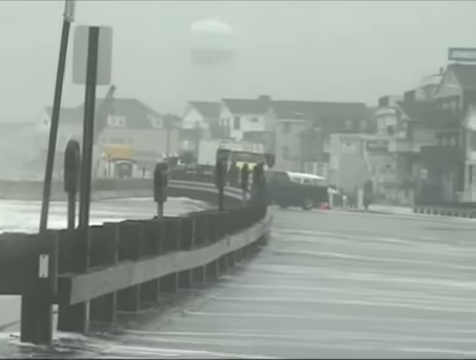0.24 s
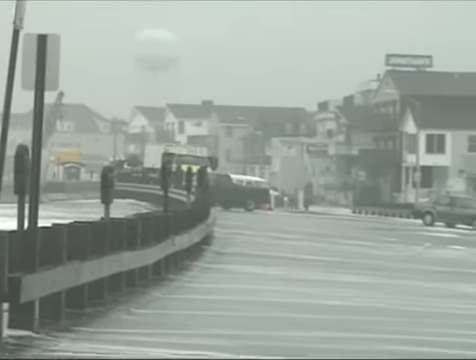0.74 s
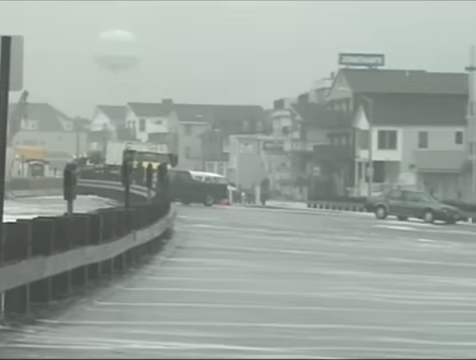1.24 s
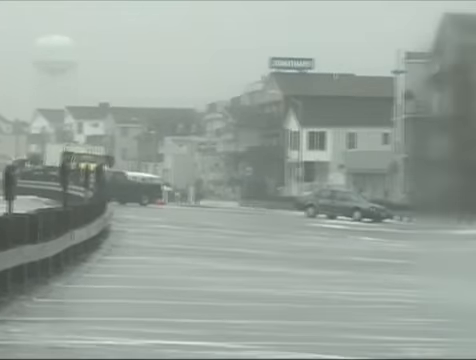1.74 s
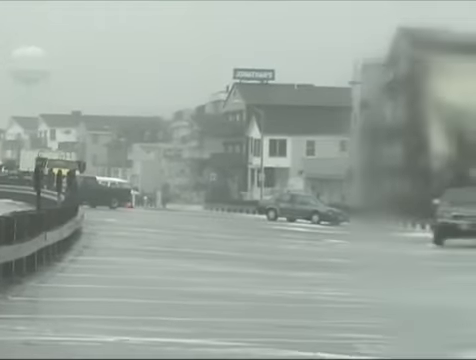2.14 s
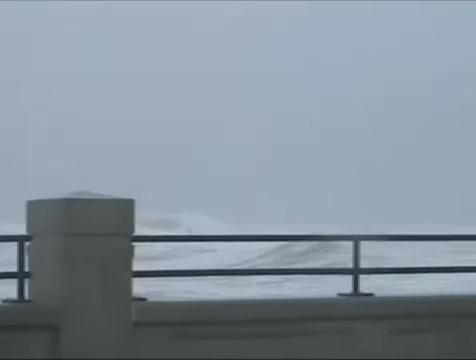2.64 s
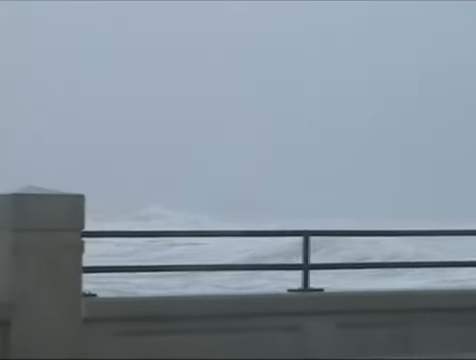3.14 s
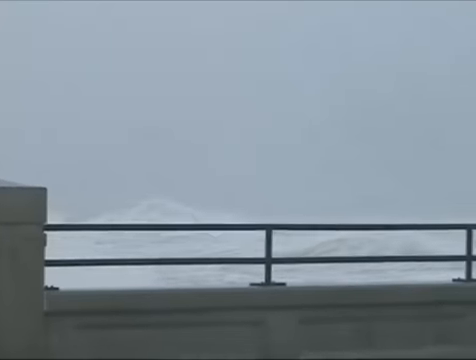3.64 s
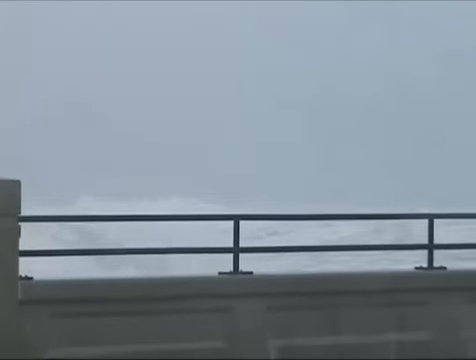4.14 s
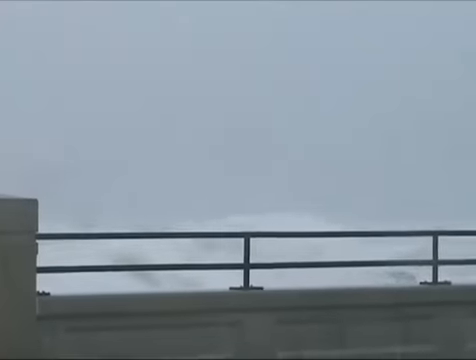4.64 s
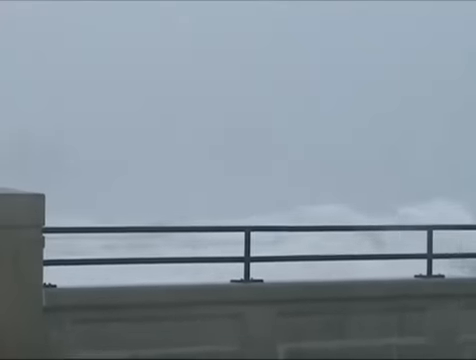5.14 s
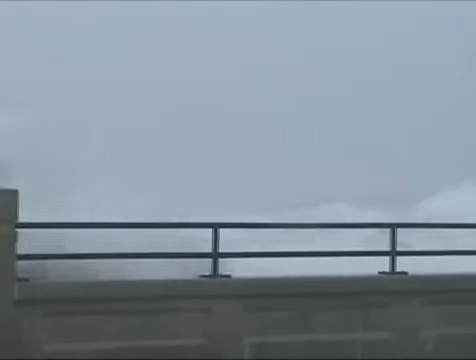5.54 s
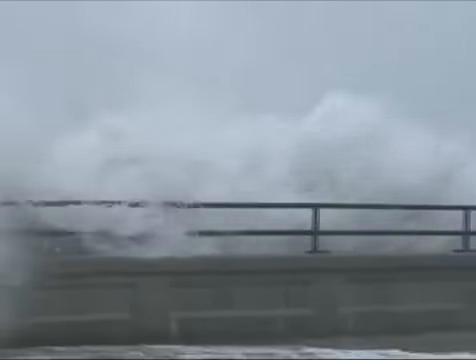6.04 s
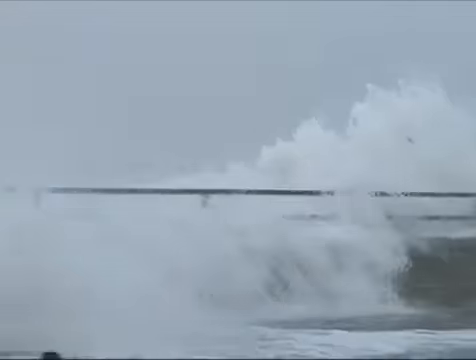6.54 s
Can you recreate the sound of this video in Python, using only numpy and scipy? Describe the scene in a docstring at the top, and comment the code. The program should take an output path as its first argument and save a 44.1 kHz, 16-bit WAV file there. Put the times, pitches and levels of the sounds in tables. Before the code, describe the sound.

A muffled roar of heavy waves and wind is heard from within a closed car on a sea front, its engine idling with a deep hum. Spray ticks lightly on the roof and glass. After about a second and a half a windshield wiper scrapes, thumps and shudders across and back, then knocks to rest. The storm continues evenly, with brief faint rustles and a very faint camera whine beside the microphone.

```python
"""Inside a parked car on a sea front in a storm, with the windows shut and the engine idling. Surf, wind and
blower air blend into a dull roar, coloured by the resonances of the cabin, over the boom of the engine's firing
rate. The wiper makes one sweep out and back, its rubber juddering and its arm knocking. Spray ticks on roof and
glass, brief rustles sound in the treble, and the tape drum of a hand-held camera whines faintly next to the
microphone. Between about 2 and 3.7 s the sound slowly changes from its street-side colour to its sea-side
colour."""
import sys
import numpy as np
from scipy import signal
from scipy.fft import rfft, irfft, next_fast_len
from scipy.io import wavfile
from scipy.ndimage import uniform_filter1d

SR = 44100
rng = np.random.default_rng(int(sys.argv[2]) if len(sys.argv) > 2 else 0)


def transcribe(signal):
    """Save signal, clipped to [-1, 1], as a 16-bit WAV file at the path in sys.argv[1]."""
    frames = np.atleast_2d(signal).T
    limited = np.clip(frames, -1, 1)
    pcm = np.round(limited * 32767).astype(np.int16)
    wavfile.write(sys.argv[1], SR, pcm)


N = 299437

# spectra of the roar, street-side and sea-side: (frequency [Hz], relative density [dB])
STREET_ROAR = [(12, -52), (27, -13.5), (42, -3.5), (90, -14.5), (160, -16.5), (235, -21), (280, -24.5),
               (400, -27.5), (600, -28), (800, -35.5), (1400, -36.5), (2000, -46), (3300, -47.5),
               (4500, -55), (6500, -63.5), (9000, -100)]
SEA_ROAR = [(12, -47), (27, -13.5), (42, -6.5), (90, -12), (150, -13), (220, -18.5), (270, -21.5),
            (400, -24), (720, -26.5), (830, -32.5), (1500, -35.5), (2100, -42.5), (3300, -46),
            (4500, -53.5), (5400, -58), (6500, -64.5), (9000, -89)]
# cabin resonances: (frequency [Hz], width [Hz], street-side gain [dB], sea-side gain [dB])
CABIN_MODES = [(90, 20, 2, 2), (160, 25, 4, 0), (195, 30, 3, 5), (236, 20, 4, 2), (310, 40, 5, 4),
               (470, 50, 3, 2), (690, 120, 1, 3), (1180, 150, 4, 0), (980, 120, 0, 3), (2800, 600, 0, 2),
               (878, 34, 11, 0)]
# strength of the storm: (time [s], level [dB], treble gain [dB])
STORM_LEVELS = [(0, -30.5, -7), (1.1, -30, -6.5), (1.5, -30.5, -7.5), (2.8, -34.5, -4.5), (3.5, -33, -6.5),
                (3.95, -30, -4.5), (4.55, -30.5, -7.5), (4.85, -32, -2.5), (5.12, -31, -5.5),
                (5.35, -31.5, -3.5), (5.6, -31.5, -3.5), (5.9, -31.5, -2.5), (6.2, -32, -0.5),
                (6.45, -31.5, -4), (6.79, -32, -4.5)]
# engine boom at the microphone: (time [s], level [dB])
BOOM_LEVELS = [(0.0, -27), (0.17, -25), (2.23, -25), (2.44, -31), (2.55, -28.5), (3.63, -31), (3.72, -25.5),
               (3.99, -31.5), (4.1, -25.5), (4.25, -39), (4.97, -28.5), (5.99, -32.5), (6.35, -26.5),
               (6.69, -29.5), (6.79, -36)]
# its overtones: (multiple of the firing rate, street-side level [dB], sea-side level [dB])
BOOM_OVERTONES = [(1.5, -50, -46), (2, -41, -40), (3, -46, -42), (5, -49, -48)]
# stretches of the blade's travel on wet glass: (start [s], length [s], rise [s], rumble [dB],
# scrape [dB], water hiss [dB], squeal [dB], slope of all but the rumble [dB/s])
BLADE_STROKES = [(1.475, 0.057, 0.023, -27.5, -60, -64, -62, 0),
                 (1.499, 0.096, 0.05, -24, -37.5, -60, -48, 0),
                 (1.558, 0.13, 0.045, -27.5, -42, -53.5, -62, -3),
                 (1.637, 0.12, 0.034, -27.5, -48, -58, -60, 5), (1.72, 0.7, 0.04, -35, -46, -57, -62, -21),
                 (2.064, 0.08, 0.019, -45, -55, -75, -58, 0), (2.39, 0.17, 0.056, -35, -53, -57, -55, 0),
                 (2.508, 0.22, 0.04, -32, -61, -56, -48, -19)]
# spectra of linkage, scraping rubber, ringing lip and water: (frequency [Hz], relative density [dB])
LINKAGE_RUMBLE = [(50, -37), (85, -0.5), (130, -1), (180, -4), (300, -11.5), (450, -21.5), (700, -21.5),
                  (1000, -38), (1600, -30)]
RUBBER_SCRAPE = [(350, 13.5), (600, -19), (900, -6), (1200, -3), (1400, -15), (1900, -8), (2500, -13.5),
                 (3400, -15), (4500, -29)]
LIP_SQUEAL = [(950, -29), (1100, -2), (1180, 5), (1280, -11), (1550, -26), (1880, -8), (2000, -20),
              (2120, -14), (2250, -22), (2420, -12), (2600, -29)]
WATER_HISS = [(2500, 16.5), (3500, 15), (5000, 5), (6200, 2), (6800, 0), (8500, 3), (9400, -6),
              (10500, -30)]
# impacts of arm and blade: (time [s], tick [dB], ring [dB], ring centre [Hz], panel thump [dB],
# thump centre [Hz], spit of water [dB])
WIPER_IMPACTS = [(1.510, -46, -40, 1900, -22, 180, -53), (1.533, -44, -31, 1150, -26, 180, -56),
                 (1.541, -33, -23, 620, -20, 180, -50), (1.547, -36, -21, 325, -16, 145, -52),
                 (1.558, -34, -32, 1550, -22, 180, -44), (1.570, -38, -35, 1550, -16, 180, -49),
                 (1.590, -46, -36, 870, -15, 115, -47), (1.623, -44, -36, 1550, -16, 100, -48),
                 (1.643, -46, -30, 400, -21, 180, -52), (1.657, -38, -35, 1550, -26, 145, -44),
                 (1.673, -32, -18, 620, -19, 180, -50), (1.685, -38, -30, 1120, -14, 125, -44),
                 (1.692, -44, -22, 540, -18, 180, -52), (1.706, -44, -31, 1150, -11, 118, -49),
                 (1.8515, -44, -28, 960, -26, 145, -54), (1.855, -56, -44, 3800, -40, 145, -58),
                 (1.866, -56, -37, 1040, -40, 145, -58), (2.103, -44, -35, 1150, -27, 145, -50),
                 (2.118, -54, -36, 870, -17, 105, -64), (2.130, -50, -42, 3300, -30, 115, -62),
                 (2.132, -54, -37, 1550, -40, 115, -64), (2.460, -50, -40, 560, -21, 180, -58),
                 (2.7090, -23.5, -21, 620, -26, 180, -58)]
# modes of the wiper arm: (frequency [Hz], time to fall 60 dB [s])
ARM_MODES = [(325, .05), (560, .035), (690, .02), (870, .03), (1040, .045), (1140, .045), (1550, .025),
             (1870, .022), (2600, .02), (3400, .02), (3800, .025)]
# modes of the body panel under the arm: (frequency [Hz], gain [dB])
PANEL_MODES = [(95, -4), (115, 0), (145, -2), (180, 0)]
# spectra of an impact's tick and of the spray: (frequency [Hz], relative density [dB])
IMPACT_TICK = [(300, -3), (800, 0), (1400, -3), (2200, -5), (2800, -11), (3400, -21), (4200, -29),
               (7500, -28), (9200, -17), (10500, -28)]
SPRAY_TICK = [(400, -21), (1000, 16.0), (2500, -12.5), (4500, -14), (7000, -43)]
# rustles in the treble: (start [s], length [s], level [dB], share of the dull spectrum [0-1])
RUSTLE_EVENTS = [(3.291, 0.11, -56.5, 0.16), (3.859, 0.18, -59, 0.1), (3.937, 0.018, -47, 0.33),
                 (3.977, 0.014, -46.5, 0.8), (5.05, 0.1, -56.5, 0.98), (5.8, .18, -59.5, 0.7),
                 (2.025, .03, -55, 1)]
# their two spectra: (frequency [Hz], relative density [dB])
BRIGHT_SPECTRUM = [(2500, -11), (5000, -1), (6000, -8), (7000, -4), (9000, -1), (10500, -11)]
DULL_SPECTRUM = [(1200, -2), (2000, -7), (3000, -2.5), (4000, -13), (6000, -17)]
# whine of the tape drum: (multiple of the rotation rate, rms level [dB])
DRUM_HARMONICS = [(12, -76), (14, -75), (16, -71), (18, -76), (20, -78), (22, -81), (26, -79), (28, -78),
                  (32, -87), (34, -84), (36, -85), (38, -81), (40, -82), (42, -85), (44, -86), (46, -88),
                  (48, -90), (58, -84), (60, -84), (62, -86), (66, -91), (70, -89), (72, -92)]
# other steady tones of the tape drive: (frequency [Hz], rms level [dB])
DRIVE_TONES = [(3143.1, -75), (3592.6, -76), (3689, -79), (3816.5, -79), (4042.4, -79), (4265.4, -86),
               (4491.3, -77), (8434, -84), (10008, -91), (10196, -88), (10423, -82), (10648, -91)]
# hiss of the heads on the tape: (frequency [Hz], relative density [dB])
HEAD_SPECTRUM = [(4500, -30), (6300, -17.5), (7500, -6.5), (8400, -4.5), (9100, -1), (9600, -13),
                 (10300, -9.5), (10700, -9.5)]


def amp(db):
    """Amplitude ratio of a level in decibels."""
    return 10 ** (np.asarray(db) / 20)


def unit_rms(x):
    """Normalisation to an rms of 1."""
    return x / np.sqrt(np.mean(x ** 2) + 1e-20)


def gain_at(spectrum, hz):
    """Gain of a spectrum interpolated in log frequency, -90 dB outside its range."""
    f, db = np.transpose(spectrum)
    return amp(np.interp(np.log(hz + 1), np.log(f + 1), db, left=-90, right=-90))


def curves(rows, t):
    """Linear interpolation of each column of a time table at times t."""
    times, *columns = np.transpose(rows)
    return [np.interp(t, times, column) for column in columns]


def coloured(x, spectrum):
    """Filtering by multiplication of spectra; the result has rms 1."""
    size = next_fast_len(len(x))
    gain = gain_at(spectrum, np.fft.rfftfreq(size, 1 / SR))
    return unit_rms(irfft(rfft(x, size) * gain, size)[:len(x)])


def noise(spectrum, size=N):
    """Gaussian noise of the given spectrum and rms 1."""
    return coloured(rng.standard_normal(size), spectrum)


def wander(seconds):
    """Random fluctuation of rms 1, smoothed over the given time."""
    size = round(seconds * SR)
    return unit_rms(uniform_filter1d(uniform_filter1d(rng.standard_normal(N), size), size))


def add(mix, start_s, sound):
    """Superposition of a sound on the mix from a given time."""
    part = mix[round(start_s * SR):][:len(sound)]
    part += sound[:len(part)]


def sea_blend(t, start_s=2.05, end_s=3.68):
    """Progress of the change from street-side to sea-side sound: 0 street-side, 1 sea-side."""
    return np.clip((t - start_s) / (end_s - start_s), 0, 1)


def storm_roar(frame=2048, hop=512):
    """Transmission loss and resonance: glass, trim and cabin shape the noise of surf, wind and blower."""
    frames, hz = N // hop + 5, np.fft.rfftfreq(frame, 1 / SR)
    t = np.arange(frames) * hop / SR
    real, imaginary, patches = rng.standard_normal((frames, len(hz), 3)).T
    white = real + 1j * imaginary
    patches = uniform_filter1d(patches, 20, axis=0)  # smooth in frequency, then in time
    patch_db = 1.3 * unit_rms(uniform_filter1d(patches, 6, axis=1))
    flicker_db = 0.44 * unit_rms(uniform_filter1d(rng.standard_normal(frames), 3))
    sea = sea_blend(t)
    shape = np.outer(gain_at(STREET_ROAR, hz), np.sqrt(1 - sea))
    shape += np.outer(gain_at(SEA_ROAR, hz), np.sqrt(sea)) * amp(-1.5)
    for mode_hz, width_hz, street_db, sea_db in CABIN_MODES:
        resonance = 1 / (1 + (2 * (hz - mode_hz) / width_hz) ** 2)
        shape *= amp(np.outer(resonance, street_db + (sea_db - street_db) * sea))
    level_db, bright_db = curves(STORM_LEVELS, t)
    treble = np.clip(np.log2(hz / 700 + 1e-9) / 3, 0, 1)[:, None]  # gusts and spray show most here
    gain = unit_rms(shape) * amp(level_db + treble * (bright_db + flicker_db) + patch_db)
    _, roar = signal.istft(gain * white, nperseg=frame, noverlap=frame - hop)
    _, unshaped = signal.istft(white, nperseg=frame, noverlap=frame - hop)
    return roar[:N] / unshaped.std()


def engine_boom(firing_hz=37.1):
    """Forced vibration: the cabin booms at the firing rate; uneven firings make each partial waver."""
    boom_db, = curves(BOOM_LEVELS, T)
    phase = 2 * np.pi * np.cumsum(firing_hz + 0.5 * wander(0.078)) / SR
    out = amp(boom_db + 1.1 * wander(0.4)) * np.cos(phase)
    for multiple, street_db, sea_db in BOOM_OVERTONES:
        level_db = street_db + (sea_db - street_db) * sea_blend(T) + 1.7 * wander(0.12)
        out += amp(level_db) * np.cos(multiple * phase + 2 * np.pi * rng.random())
    return np.sqrt(2) * out


def wiper_sweep(release_s=0.043):
    """Stick-slip friction: rubber judders on the glass, pushing water; the linkage shakes the body."""
    envelopes = np.zeros((4, N))
    for start_s, length_s, rise_s, *levels_db, slope in BLADE_STROKES:
        t = np.clip(T - start_s, 0, length_s)
        shape = np.clip(t / rise_s, 0, 1) * np.clip((length_s - t) / release_s, 0, 1)
        envelopes += np.outer(amp(levels_db), shape) * amp(np.outer([0, slope, slope, slope], t))
    judder = amp(2.8 * wander(0.004))
    rumble = noise(LINKAGE_RUMBLE)
    scrape = unit_rms(judder * noise(RUBBER_SCRAPE))
    squeal = unit_rms(amp(5.1 * wander(0.0089)) * noise(LIP_SQUEAL))
    water = unit_rms(amp(1.2 * wander(0.0089)) * noise(WATER_HISS))
    return np.sum(envelopes * [rumble, scrape, water, squeal], axis=0)


def wiper_knocks(arm_db_per_octave=-30, panel_db_per_octave=-45, thump_t60_s=0.1, spit_decay_s=0.006):
    """Impact excitation: a blow ticks, spits water and rings arm and panel modes near its own pitch."""
    out, t = np.zeros(N), T[:6000]
    tick = coloured(-signal.unit_impulse(512, 40), IMPACT_TICK)
    tick /= abs(tick).max()
    ring_delay_s = 30 / SR  # the ring starts with the tick
    attack = np.sin(np.pi / 2 * np.clip(t / 0.0004, 0, 1)) ** 2
    thump_envelope = amp(-60 * t / thump_t60_s) * (1 - np.exp(-t / 0.0034))
    for start_s, tick_db, ring_db, ring_hz, thump_db, thump_hz, spit_db in WIPER_IMPACTS:
        for hz, t60_s in ARM_MODES:
            mode_db = ring_db + arm_db_per_octave * abs(np.log2(hz / ring_hz))
            ring = -attack * amp(mode_db - 60 * t / t60_s) * np.cos(2 * np.pi * hz * t)
            add(out, start_s + ring_delay_s, ring)
        for hz, gain_db in PANEL_MODES:
            mode_db = thump_db + gain_db + panel_db_per_octave * abs(np.log2(hz / thump_hz))
            add(out, start_s, -thump_envelope * amp(mode_db) * np.sin(2 * np.pi * hz * t))
        spit = attack * np.exp(-t / spit_decay_s) * noise(WATER_HISS, len(t))
        add(out, start_s, amp(tick_db) * tick)
        add(out, start_s, amp(spit_db) * spit)
    return out


def spray(drops_per_s=300, level_db=-57):
    """Shot noise: wind-blown drops strike roof and glass at random, and the trim dulls their ticks."""
    strength = amp(3.5 * np.minimum(rng.exponential(1, N), 3.5))
    hits = rng.random(N) < drops_per_s / SR
    polarity = rng.choice([-1, 1], N)
    return amp(level_db) * coloured(strength * hits * polarity, SPRAY_TICK)


def rustles():
    """Windowed noise: brief hisses, each a blend of a bright and a dull spectrum."""
    out = np.zeros(N)
    for start_s, length_s, level_db, dull in RUSTLE_EVENTS:
        hiss = (1 - dull) * noise(BRIGHT_SPECTRUM, 8192) + dull * noise(DULL_SPECTRUM, 8192)
        window = np.hanning(round(length_s * SR))
        add(out, start_s, amp(level_db) * window * hiss[:len(window)])
    return out


def tape_drive(drum_hz=149.85, hiss_db=-66.5):
    """Periodic rotation: a steady whine, and a hiss that pulses as the drum's two heads meet the tape."""
    flicker_db = 2.6 * wander(0.054)  # a random level flicker, added to each tone
    harmonics = [(multiple * drum_hz, db) for multiple, db in DRUM_HARMONICS]
    whine = np.zeros(N)
    for hz, db in harmonics + DRIVE_TONES:
        level_db = db + np.roll(flicker_db, rng.integers(N))
        whine += np.sqrt(2) * amp(level_db) * np.cos(2 * np.pi * (hz * T + rng.random()))
    head_contact = 2.2 + np.exp(-(2 * drum_hz * T % 1) / 0.25)
    hiss_flicker = amp(1.7 * np.tanh(wander(0.014)))
    hiss = unit_rms(hiss_flicker * coloured(head_contact * rng.standard_normal(N), HEAD_SPECTRUM))
    return whine + amp(hiss_db) * hiss


T = np.arange(N) / SR


def scene():
    """Superposition: the pressures of all sources add at one microphone."""
    mix = engine_boom() + storm_roar() + spray() + wiper_sweep() + wiper_knocks() + rustles()
    return (mix + tape_drive())[None]


def record(dry, low_hz=16, high_hz=10750):
    """Band limiting: the microphone loses the deepest bass, and a steep low-pass cuts the top treble."""
    high_pass = signal.butter(2, low_hz, "high", fs=SR, output="sos")
    low_pass = signal.firwin(511, high_hz, window=("kaiser", 9), fs=SR)
    return signal.oaconvolve(signal.sosfilt(high_pass, dry), low_pass[None], "same")


dry = scene()
out = record(dry)
transcribe(out)
```